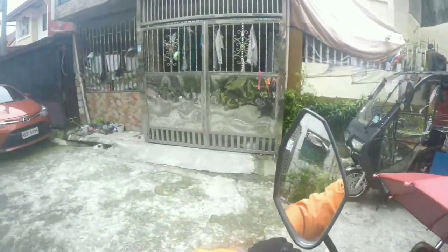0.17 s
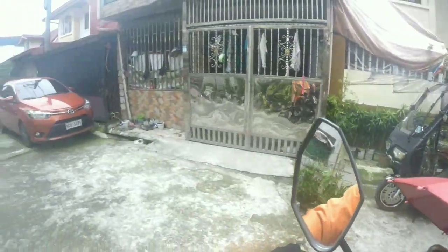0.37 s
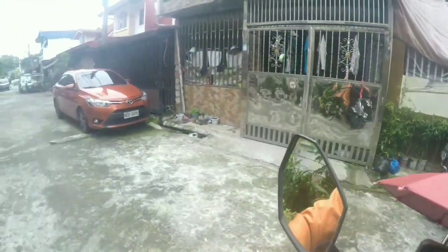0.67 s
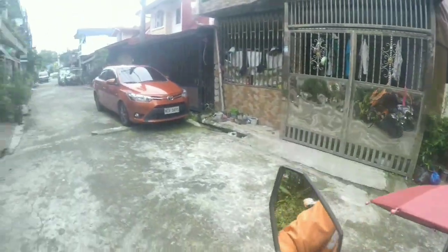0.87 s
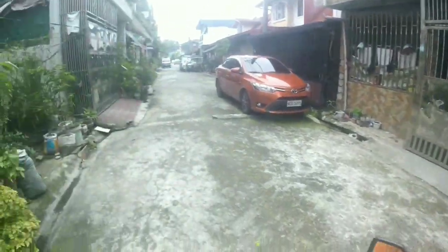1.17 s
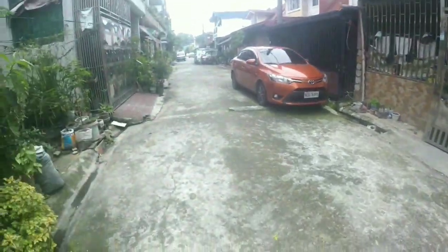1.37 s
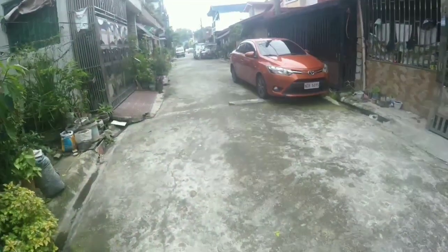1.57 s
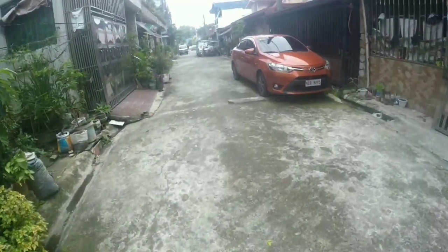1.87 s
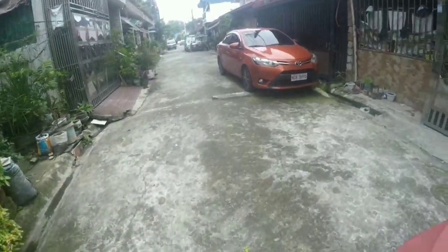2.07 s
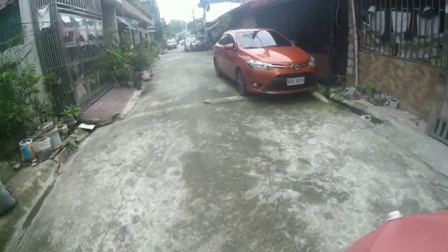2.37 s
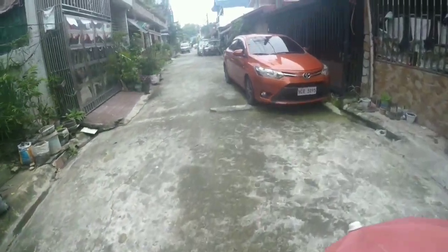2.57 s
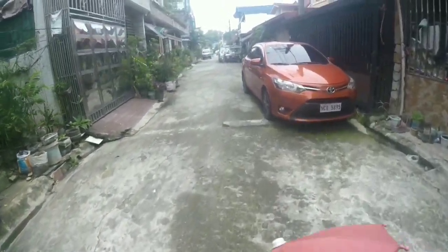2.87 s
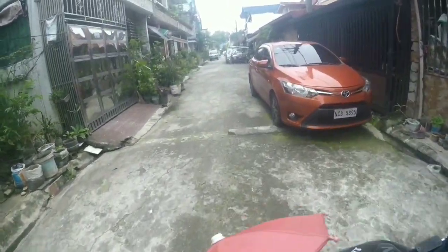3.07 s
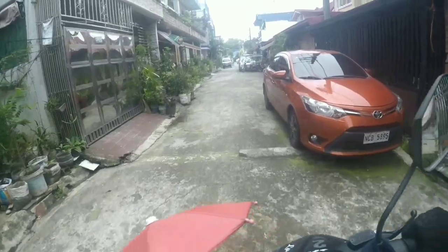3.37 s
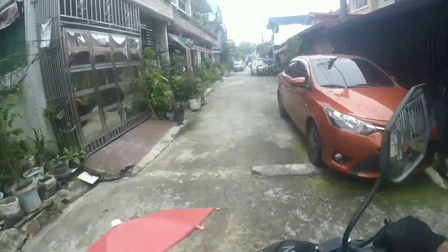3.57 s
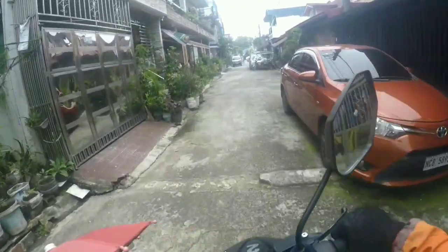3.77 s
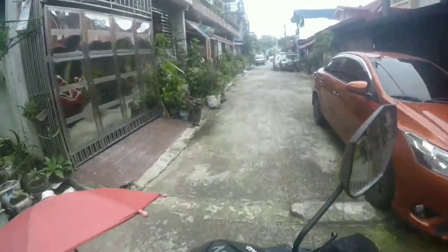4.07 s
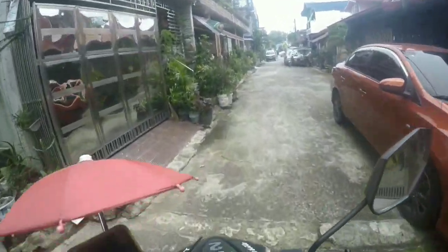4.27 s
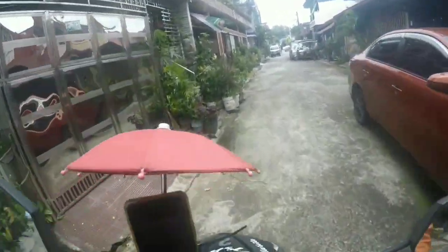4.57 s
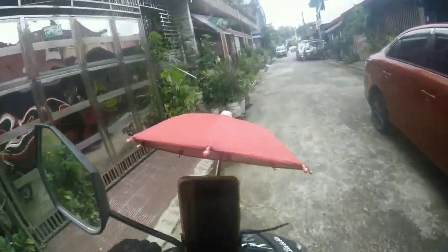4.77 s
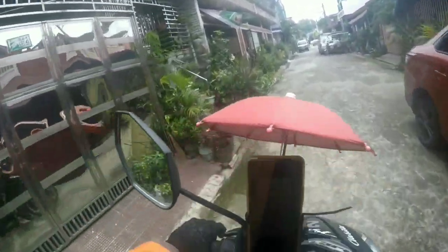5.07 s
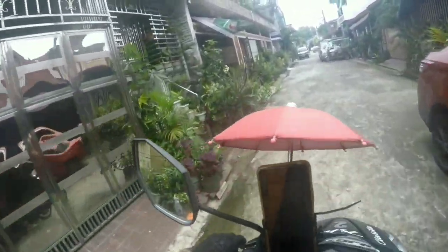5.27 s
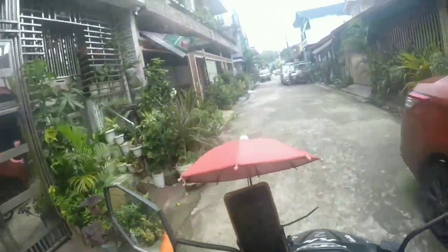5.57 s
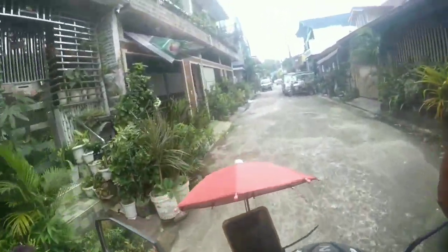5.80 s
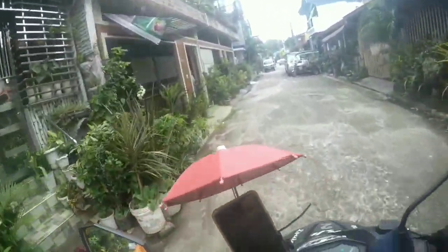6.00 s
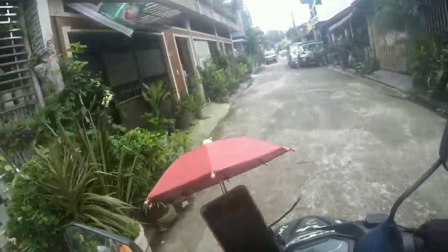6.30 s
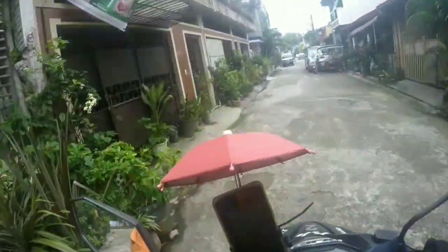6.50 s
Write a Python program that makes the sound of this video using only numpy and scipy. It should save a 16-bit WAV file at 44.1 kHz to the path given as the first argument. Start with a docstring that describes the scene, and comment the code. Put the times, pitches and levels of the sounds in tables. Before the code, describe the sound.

A single-cylinder motorcycle rolls slowly along a narrow concrete street, heard from the rider's seat, with low wind buffeting the microphone throughout. For the first second the engine throbs gently while the suspension thumps and panels rattle over the paving. At about 1.4 seconds the throttle opens: the exhaust booms deeply, the intake growls and the valves clatter, loudest until around 2.7 seconds. From 3 seconds the engine slows and knocks under load, with a few sharp ticks, then light bumps and a faint squeal near 4 seconds. Around 4.8 seconds the throttle opens again; the chain whirrs and slaps its guard, and metal parts rattle and squeak briefly until about 6 seconds. The engine then slows, with a short, faint high hiss at 6.2 seconds and a brief soft hoot at 6.5 seconds.

```python
"""A single-cylinder motorcycle rolls slowly down a narrow concrete street, heard from the rider's seat.
It starts gently, bumping over the paving, with air buffeting the microphone throughout. Near 1.4 s the
throttle opens: the exhaust booms with the firings, the intake growls, the valves clatter. From about 3 s
the engine slows and knocks under load. Near 4.8 s the throttle opens again, the chain slaps its guard
and metal parts squeak. After 6 s the engine slows with a short hiss and a soft hoot."""
import sys
import numpy as np
from scipy import signal
from scipy.fft import rfft, irfft
from scipy.io import wavfile
from scipy.ndimage import uniform_filter1d, minimum_filter1d

SR = 44100
rng = np.random.default_rng(int(sys.argv[2]) if len(sys.argv) > 2 else 0)


def wav_record(signal):
    """Record a signal, one row per channel, as 16-bit PCM in the file named by sys.argv[1]."""
    frames = np.transpose(np.atleast_2d(signal))
    bounded = np.clip(frames, -1, 1)
    # unit amplitude maps onto the largest positive 16-bit level
    quanta = np.round(bounded * 32767).astype(np.int16)
    wavfile.write(sys.argv[1], SR, quanta)


N = 292824

# chain whirr, growing as the bike gathers speed: (time [s], level [dB])
CHAIN_LEVEL = [(0,-57.5),(1.2,-54),(2.6,-47),(4.4,-49),(5.4,-42.5),(5.95,-40.5),(6.25,-45),(6.64,-47)]
# how hard the engine struggles, which makes it knock: (time [s], strain [0-1])
STRAIN = [(2.55,0),(2.95,.5),(3.45,.6),(3.7,0)]
# where metal parts meet in each engine cycle: (place in the cycle [0-1], strength [0-1])
METAL_CONTACTS = [(0.051,0.69),(.4,0.56),(0.538,0.3)]
# dull knocks of the struggling engine: (place in the cycle [0-1], strength [0-1])
DULL_KNOCK_PLACES = [(.33,1),(.47,.8)]


def exhaust_boom(firing_hz, resonance_hz=29.63, pull=.6, stumble_s=.024):
    """The firings pump a deep resonance, which pulls the pitch towards its own."""
    # strength of the boom: (time [s], level [dB])
    levels = [(0,-29),(.12,-31),(.33,-23),(.45,-34),(.57,-13.5),(.66,-31),(.76,-14.5),(.87,-12.5),(.95,-30),(1.03,-27),(1.1,-28),(1.21,-12.5),(1.33,-24),(1.43,-16),(1.53,-5),(1.64,-4),
              (1.89,-9.5),(2.35,-3.5),(2.52,-6.5),(2.66,-5),(2.81,-19),(2.92,-12),(3.02,-11.5),(3.14,-13),(3.22,-22.5),(3.31,-15),(3.5,-13.5),(3.6,-30),(3.72,-14.5),(3.77,-23),(3.83,-14),
              (3.94,-28),(4.04,-20),(4.1,-33),(4.16,-16.5),(4.22,-32),(4.3,-17.5),(4.39,-28.5),(4.5,-16),(4.66,-16.5),(4.81,-16),(4.95,-16.5),(5.06,-11.5),(5.17,-21),(5.29,-8.5),(5.37,-10.5),
              (5.43,-26),(5.52,-17),(5.58,-22),(5.65,-13.5),(5.78,-25),(5.96,-21),(6.14,-16.5),(6.24,-18),(6.4,-24.5),(6.52,-21.5),(6.64,-19)]
    # the boom dies for an instant and comes back half a beat out of step: (time [s])
    stumbles = [.49, .975, 3.22, 3.98, 4.955, 5.41, 5.87, 6.06, 6.19]
    boom_db, = in_time(levels)
    stumble = np.prod([np.tanh((np.arange(N) / SR - s) / stumble_s) for s in stumbles], axis=0)
    # the further the firing rate falls below the resonance, the more the beat wanders
    looseness = np.clip(.21 * (resonance_hz - firing_hz), 0, 1)
    pitch_hz = firing_hz + pull * (resonance_hz - firing_hz)
    turns = np.cumsum(pitch_hz) / SR + looseness * .08 * drift(rate_hz=3)
    return from_db(boom_db) * stumble * np.sqrt(2) * np.sin(2 * np.pi * turns)


def exhaust_drone(cycles, firing_hz, load_db, waver_db=1.5, fall_db=1.27):
    """The silencer passes only low tones of the exhaust; each swells as it meets the pipe resonance."""
    # strength of the drone: (time [s], level [dB])
    levels = [(0,-47.5),(.9,-40.5),(1.25,-28),(1.45,-40),(1.7,-34.5),(2.05,-34),(2.4,-31.5),(2.8,-34),(3.5,-35.5),(3.9,-36),(4.3,-39.5),(4.6,-34),(5.3,-32),(5.62,-35),(5.77,-36),(5.95,-33),(6.64,-35)]
    # what the silencer lets through: (pitch [Hz], gain [dB])
    silencer = [(40,-14),(58,4.5),(75,3.5),(88,-4.5),(100,0),(118,0.5),(130,0.5),(140,-1),(152,-10),(170,-18)]
    drone_db, = in_time(levels)
    hz, db = np.transpose(silencer)
    tones = np.zeros(N)
    for multiple in range(2, 7):
        tone_db = np.interp(multiple * firing_hz, hz, db) - fall_db * (multiple - 4)
        tone_db += waver_db * drift(3.9)
        tones += from_db(tone_db) * np.sin(2 * np.pi * (multiple * cycles + rng.random()))
    # off the throttle the firings come out unequal, so the drone sputters
    strengths = np.minimum(rng.standard_normal(512), 1)
    sputter_db = .4 * np.abs(load_db) * np.interp(cycles, np.arange(len(strengths)), strengths)
    return from_db(drone_db + sputter_db) * rms_one(tones)


def intake(cycles, gulp, growl_db=-36.3, pop_place=.89):
    """The intake valve pops at every gulp of air, and rushes of air make the airbox rasp."""
    # tones in the pop: (multiple of the firing rate, relative level [dB])
    pop_tones = [(6,1),(7,-1.5),(8,-6),(9,-2),(10,1.5),(11,-3),(12,-1),(13,-4),(14,5),(15,-7),(16,-4.5),(17,-2.5),(18,-8),(19,-2.5),(21,-7),(24,-11),(27,-8),(30,-9),(32,-4),(35,-9),(37,-6),(42,-6),(44,-18),(47,-11),(50,-11),(56,-18),(64,-16),(100,-28)]
    # rushes of air: (place in the cycle [0-1], strength [0-1])
    rushes = [(.2,1),(.72,.8)]
    # airbox resonances: (pitch [Hz], width [Hz], level at wide throttle [dB])
    airbox = [(1126,48,-45),(1194,64,-44),(1430,46,-47),(1532,58,-49)]
    waver = from_db(.8 * drift(10))
    growl = waver * pulse_train(cycles - pop_place + .0005 * drift(10), pop_tones)
    rush = 1 + 1.1 * cycle_hits(cycles, rushes)
    rasp = sum(from_db(db) * rms_one(rush * hoarse_tone(hz, width)) for hz, width, db in airbox)
    return gulp * (from_db(growl_db) * growl + rasp)


def machinery(cycles, load_db, gulp):
    """Piston and valves follow the load and the chain joins in: a dull rattle, clatter and fine sizzle."""
    # sharp knocks of the struggling engine: (place in the cycle [0-1], strength [0-1])
    sharp_places = [(.42,1)]
    chain_db, = in_time(CHAIN_LEVEL)
    dull_db = -38.5 + load_db - 5 * gulp ** 2  # loose parts rattle less at wide throttle
    clatter_db = 20 * np.log10(np.hypot(from_db(-41.5 + load_db), from_db(chain_db)))
    sizzle_db = -52 + .23 * (clatter_db + 41.5)
    sizzle_gain = np.hypot(from_db(sizzle_db), from_db(chain_db - 17))
    dull = band(ticking(cycles, DULL_KNOCK_PLACES, depth=.43, knock_share=.61), 166, 1440)
    clatter = band(ticking(cycles, sharp_places, depth=.13, knock_share=.17), 1314, 7300)
    sizzle = band(ticking(cycles, sharp_places, depth=.29, knock_share=.21), 4780, SR / 2)
    return (from_db(dull_db) * rms_one(dull) + from_db(clatter_db - 2) * rms_one(clatter)
            + sizzle_gain * rms_one(sizzle) + casing_ring(cycles, dull_db, clatter_db))


def ticking(cycles, knocks, depth, knock_share):
    """A rustle from the casing flares at each contact and gathers into knocks as the engine struggles."""
    # tone colour of the rustle: (pitch [Hz], relative level [dB])
    spectrum = [(120,-13),(200,-0.5),(400,-0.5),(800,-2),(1300,-5.5),(2200,-7.5),(3300,-4),(5000,-14),(6200,-21),(8000,-20.5),(10500,-22.5),(12000,-26),(15200,-29.5)]
    # resonances of the engine casing and covers: (pitch [Hz], width [Hz], boost [dB])
    casing = [(370,310,3.5),(635,134,4.5),(1190,50,4.5),(1416,360,4),(1846,350,6),(2530,920,6.5),(2932,21,6.5),(3656,150,4.5),(4300,28,8),(4430,83,4.5),(5010,320,2.5),(5620,116,-8),(6800,440,4),(9800,760,1.5),(13500,1000,5.5)]
    share = knock_share * in_time(STRAIN)[0]
    tick_power = rms_one(1 + depth * cycle_hits(cycles, METAL_CONTACTS)) ** 2
    knock_power = rms_one(cycle_hits(cycles, knocks, uneven_db=3)) ** 2
    power = (1 - share) * tick_power + share * knock_power
    return colour(rng.standard_normal(N) * np.sqrt(np.abs(power)), spectrum, casing)


def casing_ring(cycles, dull_db, clatter_db):
    """Contacts and knocks strike the engine casing, which rings on between them."""
    # ringing tones of the casing: (pitch [Hz], width [Hz], relative level [dB])
    tones = [(281.7,20.5,-9.5),(407,22,-13),(562,53,-19),(952.5,51,-13),(1113,43,-12.5),(1532,51,-12.5),(1740,16,-14),(1870,24,-13.5),(1972,104,-11.5),(2374,27,-13.5),(2577,220,-12.5),(2863,78,-16),(4055,17,-21.5),(4765,48,-20.5),(5574,150,-17)]
    push = 1 + 1.36 * cycle_hits(cycles, METAL_CONTACTS)
    push += .83 * in_time(STRAIN)[0] * cycle_hits(cycles, DULL_KNOCK_PLACES)
    ringing = np.zeros(N)
    for hz, width, db in tones:
        tone = ring(push * rng.standard_normal(N), hz, width)
        ringing += from_db(db + (dull_db if hz < 1300 else clatter_db)) * rms_one(tone)
    return band(ringing, 232, 7100)


def chain_guard(taps_per_s=110, spread_db=4):
    """The chain keeps tapping its guard and sometimes slaps it; each blow rings a little differently."""
    # ringing tones of the guard: (pitch [Hz], width [Hz], relative level [dB])
    tones = [(1593,130,-1),(1773,48,-0.5),(1950,82,2.5),(2430,63,-6),(2630,65,1),(2907,55,-4),(3716,24,-13),(4010,46,-8.5),(4460,80,-8),(4730,85,-9),(5710,120,-7)]
    # hard slaps: (time [s], strength [dB])
    hard_slaps = [(.944,-45),(4.783,-35),(5.107,-40),(5.212,-32),(5.332,-30.5),(5.624,-31),(5.666,-35),(5.757,-36),(5.885,-36),(6.434,-36)]
    chain_db, = in_time(CHAIN_LEVEL)
    tap_starts = rng.random(N) < taps_per_s / SR
    taps = tap_starts * from_db(spread_db * np.minimum(rng.standard_normal(N), 1))
    slaps = np.zeros(N)
    for s, db in hard_slaps:
        slaps[int(s * SR)] = from_db(db)
    tapping = sum(from_db(db) * ring(taps * rng.uniform(-.93, 1, N), hz, width)
                  for hz, width, db in tones)
    slapping = sum(from_db(db) * ring(slaps * rng.choice([-.43, -.078, .83, .69], N), hz, width)
                   for hz, width, db in tones)
    return band(from_db(chain_db - 3.5) * rms_one(tapping) + slapping, 1310, 6500)


def engine_knocks():
    """The engine gives a few sharp, bright knocks under load."""
    # single knocks: (time [s], strength [dB], fade time [s])
    knocks = [(3.360,-43,0.006),(3.440,-45,0.0067),(3.522,-45,.004),(4.936,-44,0.008),(5.765,-43,0.007)]
    # their tone colour: (pitch [Hz], relative level [dB])
    spectrum = [(300,-18),(600,-10),(2000,-9),(3000,-25),(5000,25),(8500,20),(11000,9),(15000,-37)]
    return bursts(knocks, spectrum)


def road_bumps():
    """The paving thumps the suspension and shakes the loose body panels; the engine knock near 3.44 s rattles
    them as well."""
    # suspension bumps and panel rattles, each: (time [s], strength [dB], fade time [s])
    bumps = [(.185,-33,.015),(.372,-22,0.025),(.895,-23,0.04),(.944,-21,0.028),(1.080,-26,0.035),(1.120,-24.5,0.024),(3.80,-30,.025),(3.94,-29,0.017),(4.08,-33,0.02),(4.17,-34,0.016),(5.172,-33,0.015)]
    rattles = [(.374,-38.5,.009),(.944,-42,0.01),(1.120,-32.3,0.012),(3.440,-36,0.013),(4.742,-35,0.014),(4.905,-34,0.0088),(5.172,-33,0.009),(5.213,-34,0.016),(5.465,-35,0.0067),(5.757,-35,.014)]
    # their tone colours, each: (pitch [Hz], relative level [dB])
    bump_spectrum = [(30,-39),(65,8.5),(130,-2.5),(190,-12),(260,-9.5),(340,-60),(900,-40.5),(2000,-43),(5000,-40)]
    rattle_spectrum = [(150,3),(300,7),(650,18.5),(900,8),(1900,11),(2400,3),(5000,-14),(12000,-27)]
    return bursts(bumps, bump_spectrum) + bursts(rattles, rattle_spectrum)


def wind():
    """Passing air presses unevenly on the microphone, with a few gusts on top."""
    # strength of the buffeting: (time [s], level [dB])
    levels = [(0,-23.5),(.2,-34),(.7,-27),(1.3,-25.5),(1.72,-31.5),(2.05,-25.5),(2.4,-30.5),(2.75,-41),(3.2,-29.5),(3.6,-26.5),(4.2,-28.5),(4.5,-26),(5.3,-28.5),(5.75,-28.5),(6.3,-28),(6.64,-27)]
    # gusts: (time [s], half length [s], level [dB])
    gusts = [(0.344,0.036,-29),(.98,0.05,-27),(1.46,0.045,-25),(3.07,0.045,-25.5),(4.127,0.07,-31)]
    # tone colour of the rumble: (pitch [Hz], relative level [dB])
    spectrum = [(8,12.5),(13,4.5),(20,-5.5),(45,5),(60,-0.5),(80,-7),(100,-9.5),(120,-15.5),(170,-23),(260,-26.5),(500,-44)]
    wind_db, = in_time(levels)
    return (from_db(wind_db) + sum(swell(*gust) for gust in gusts)) * noise(spectrum)


def squeaks():
    """Rubbing metal parts sing briefly and hoarsely, each swelling and fading on one pitch."""
    # squeaks: (time [s], half length [s], pitch [Hz], width [Hz], level [dB])
    rubs = [(0.363,0.1,5700,150,-60),(1.203,0.011,4480,220,-51),(3.95,.35,1880,170,-53.5),(3.98,.35,2520,220,-56),(4.98,0.16,4810,80,-53),(5.16,0.055,2600,60,-43.5),(5.533,0.041,2940,60,-50),(5.76,.04,2659,70,-47),(5.82,0.067,5700,140,-55.5),(5.91,0.07,1820,140,-48),(5.98,.028,4700,260,-49.5),(6.355,.025,4050,130,-52),(6.42,0.069,2320,80,-53)]
    return sum(swell(s, half, db) * hoarse_tone(hz, width) for s, half, hz, width, db in rubs)


def hiss_and_hoot(hoot_hz=600):
    """A short, high hiss and a soft, wavering hoot sound as the engine slows."""
    # tone colour of the hiss: (pitch [Hz], relative level [dB])
    spectrum = [(4500,-25),(7000,7),(10500,4),(12500,-20)]
    turns = np.cumsum(hoot_hz + 9 * drift(40)) / SR
    hiss = swell(at_s=6.17, half_s=.065, db=-54.5) * noise(spectrum)
    hoot = swell(at_s=6.5, half_s=.04, db=-41) * np.sin(2 * np.pi * turns)
    return hiss + hoot


def cycle_hits(cycles, places, fade_cycles=.079, uneven_db=6.5):
    """Pushes that return in every engine cycle and die away, never twice with the same force."""
    hits = np.zeros(N)
    for place, strength in places:
        turn = cycles + 1 - place % 1
        forces = from_db(uneven_db * np.minimum(rng.standard_normal(512), 1))
        hits += strength * forces[turn.astype(int)] * np.exp(-(turn % 1) / fade_cycles)
    return hits


def pulse_train(cycles, tones, clean_up_to=15, size=4096):
    """One pulse per firing, built from the listed tones: the low ones in step, the high ones ragged."""
    multiples, db = np.transpose(tones)
    k = np.arange(size // 2 + 1)
    level = from_db(np.interp(k, multiples, db))
    # these phases make the pulse start sharply and then ring out
    phase = 2 * rfft(irfft(np.log(level), size)[:size // 2], size).imag
    phase += (k / clean_up_to) ** 2 * rng.standard_normal(len(k))
    spectrum = level * np.exp(1j * phase) * (k >= multiples[0]) * (k <= multiples[-1])
    return np.interp(cycles % 1, np.arange(size) / size, rms_one(irfft(spectrum, size)))


def bursts(blows, spectrum):
    """Each blow starts a short shudder of noise that quickly dies away."""
    envelope = np.zeros(N)
    for s, db, fade_s in blows:
        age = np.maximum(np.arange(N) / SR - s, 0)
        envelope += from_db(db) * np.exp(-age / fade_s) * (1 - np.exp(-10 * age / fade_s))
    return envelope * noise(spectrum)


def ring(push, hz, width_hz):
    """One tone that rings when pushed; the smaller its width, the longer it lasts."""
    fade = np.exp(-np.pi * width_hz / SR)
    step = 2 * np.pi * hz / SR
    return signal.lfilter([.5, 0, -.5], [1, -2 * fade * np.cos(step), fade * fade], push + 1e-18)


def hoarse_tone(hz, width_hz):
    """A resonance kept ringing by random pushes."""
    angle = 2 * np.pi * hz * np.arange(N) / SR
    return drift(width_hz / 2) * np.cos(angle) + drift(width_hz / 2) * np.sin(angle)


def swell(at_s, half_s, db):
    """A level that rises, holds and fades around one moment."""
    return from_db(db) / (1 + ((np.arange(N) / SR - at_s) / half_s) ** 4)


def drift(rate_hz, size=8192):
    """A smooth random wobble with a typical size of 1."""
    hz = np.arange(size // 2 + 1) * SR / N
    wobble = rms_one(irfft(rfft(rng.standard_normal(size)) / (1 + (hz / rate_hz) ** 2), size))
    return np.interp(np.arange(N) * size / N, np.arange(size), wobble)


def colour(x, spectrum, resonances=()):
    """Give a sound a smooth tone colour with resonant humps on top, at an average power of 1."""
    hz = np.maximum(np.arange(N // 2 + 1) * SR / N, 1)
    points, db = np.transpose(spectrum)
    octaves_outside = np.maximum(np.log2(points[0] / hz), 0) + np.maximum(np.log2(hz / points[-1]), 0)
    db = np.interp(np.log(hz), np.log(points), db) - 20 * octaves_outside
    for centre, width, boost_db in resonances:
        db += boost_db / (1 + (2 * (hz - centre) / width) ** 2)
    return rms_one(irfft(rfft(x) * from_db(db), N))


def noise(spectrum):
    """Noise with the given tone colour."""
    return colour(rng.standard_normal(N), spectrum)


def band(x, low_hz, high_hz):
    """Keep only the sound between two pitches."""
    edges = [low_hz, min(high_hz, .45 * SR)]
    return signal.sosfilt(signal.butter(4, edges, "band", fs=SR, output="sos"), x)


def in_time(rows):
    """Join timed points with straight lines, giving one curve per value column."""
    s, *columns = np.transpose(rows)
    return [np.interp(np.arange(N) / SR, s, column) for column in columns]


def from_db(db):
    """Turn decibels into a gain."""
    return 10 ** (np.asarray(db) / 20)


def rms_one(x):
    """Scale to an average power of 1."""
    return x / np.sqrt(np.mean(x ** 2) + 1e-20)


def scene():
    """Engine speed, load and throttle shape the engine's sound; the road and the air add their own."""
    # engine speed: (time [s], firing rate [Hz])
    speeds = [(0, 25.4), (.5, 24.5), (1.25, 24.1), (1.38, 25.7), (1.56, 28.7), (1.66, 29.1), (1.8, 29.58),
              (2.0, 29.5), (2.34, 29.1), (2.57, 28.1), (2.78, 26.8), (3.4, 25.8), (3.7, 23.3), (4.3, 21.3),
              (4.58, 25.6), (5.6, 24.95), (5.8, 23.7), (6.3, 22.85), (6.64, 18.6)]
    # engine load, which follows the throttle: (time [s], level relative to full load [dB])
    loads = [(0,-12),(1.0,-13),(1.3,-5.5),(1.48,0.8),(1.62,3),(1.85,0),(2.28,1),(2.78,-3),(3.05,-0.4),(3.48,-1),(3.65,-8),(4.3,-10),(4.8,-2),(5.05,-2.5),(5.3,-0.1),(5.9,-6),(6.64,-9)]
    # gulps of intake air: (time [s], level relative to wide throttle [dB])
    gulps = [(0,-37),(1.2,-33),(1.42,-4),(1.58,-2),(2.28,-1.5),(2.45,-10),(2.6,-6),(2.85,-13.5),(3.3,-24),(3.7,-20),(4.4,-18.5),(4.8,-8),(5.4,-9),(6.0,-17.5),(6.64,-32)]
    firing_hz, = in_time(speeds)
    load_db, = in_time(loads)
    gulp = from_db(in_time(gulps)[0])
    cycles = np.cumsum(firing_hz) / SR  # counts up by one with each firing
    exhaust = exhaust_boom(firing_hz) + exhaust_drone(cycles, firing_hz, load_db)
    engine = exhaust + intake(cycles, gulp) + machinery(cycles, load_db, gulp)
    bike = engine + chain_guard() + engine_knocks() + road_bumps()
    return (bike + wind() + squeaks() + hiss_and_hoot())[None]


def record(dry, window=2048, cutoff_hz=15250, fade_s=.004):
    """A limiter turns down the loudest booms, the ends fade and the highest treble is cut."""
    needed_gain = 1 / np.maximum(np.abs(dry), 1)
    gain = uniform_filter1d(minimum_filter1d(needed_gain, window), window)
    samples_from_edge = np.minimum(np.arange(N), np.arange(N)[::-1])
    fades = np.minimum(samples_from_edge / (fade_s * SR), 1)
    low_pass = signal.ellip(10, .1, 80, cutoff_hz, fs=SR, output="sos")
    return signal.sosfilt(low_pass, dry * gain * fades)


dry = scene()
out = record(dry)
wav_record(out)
```